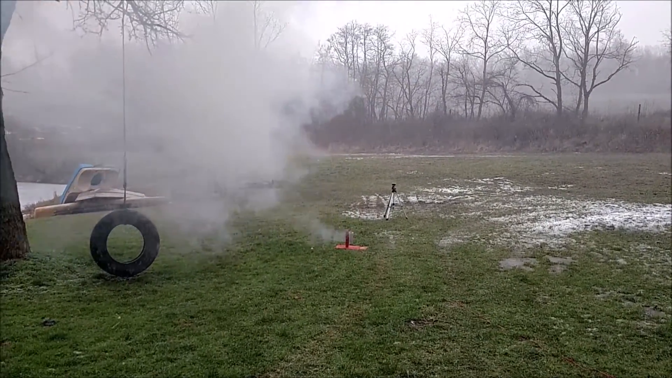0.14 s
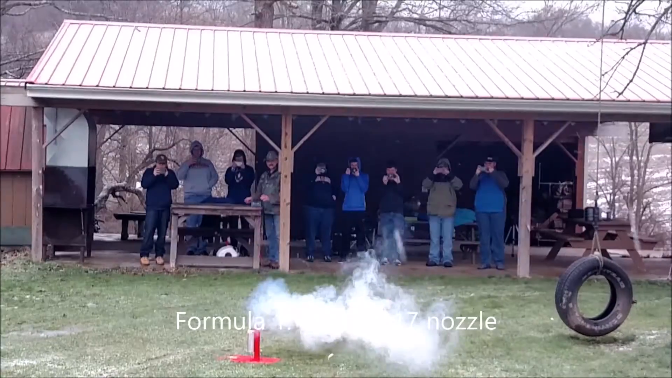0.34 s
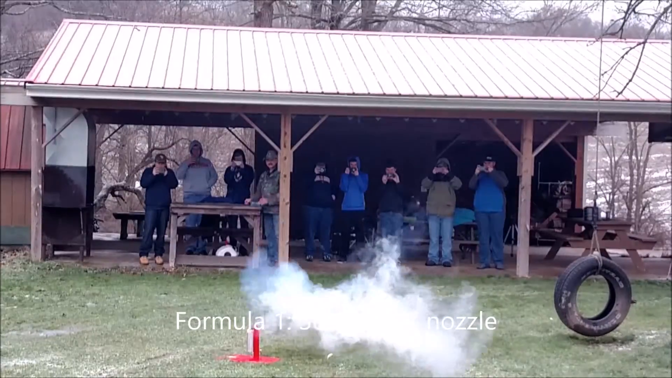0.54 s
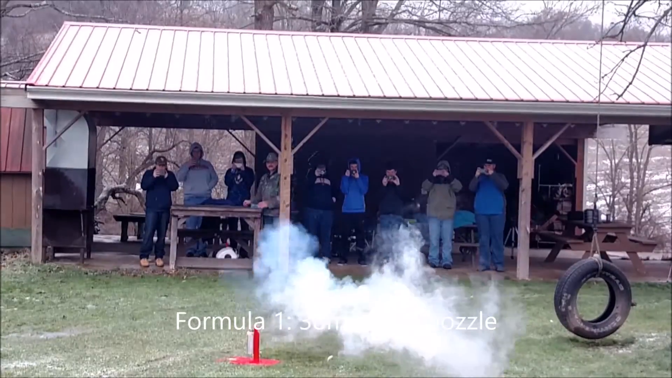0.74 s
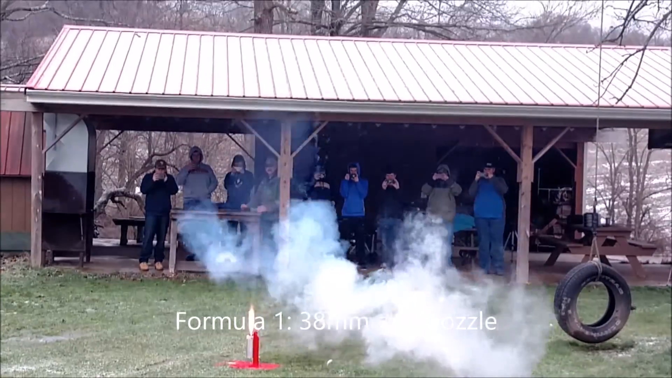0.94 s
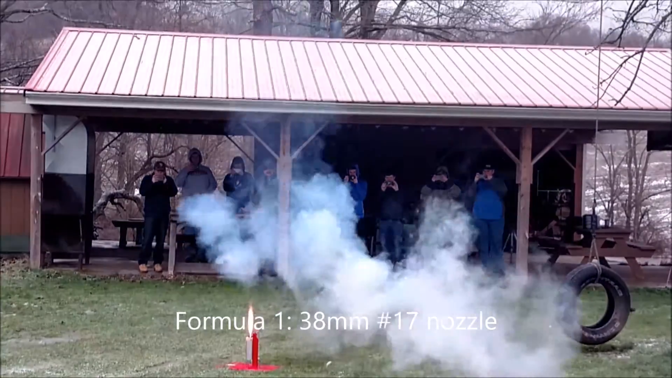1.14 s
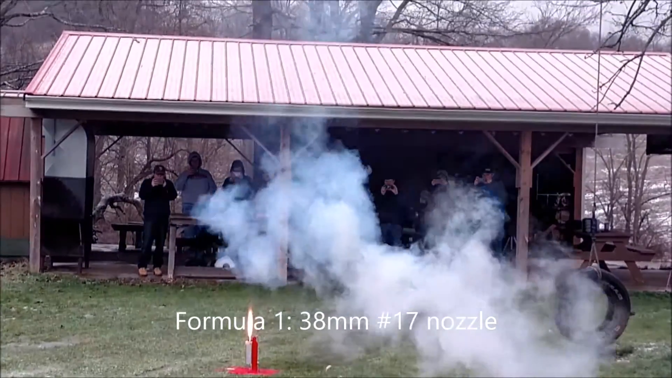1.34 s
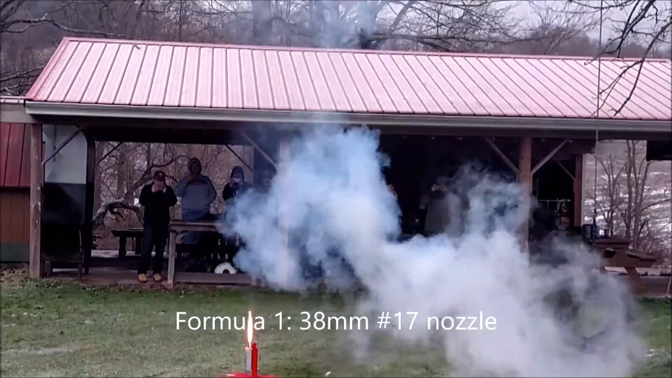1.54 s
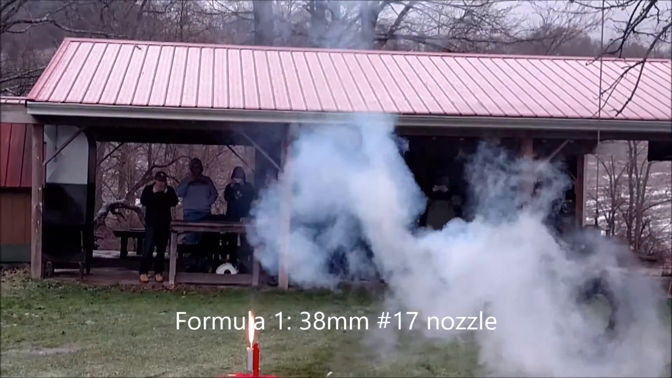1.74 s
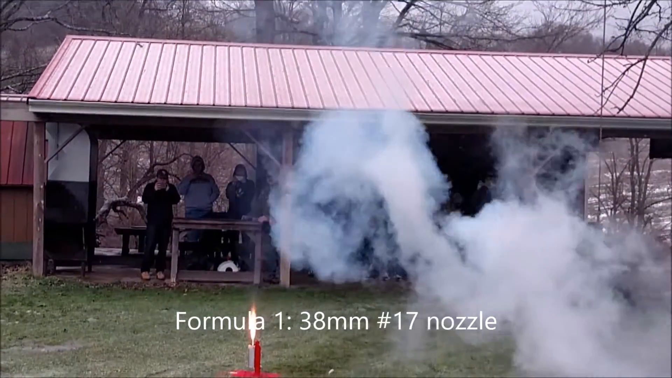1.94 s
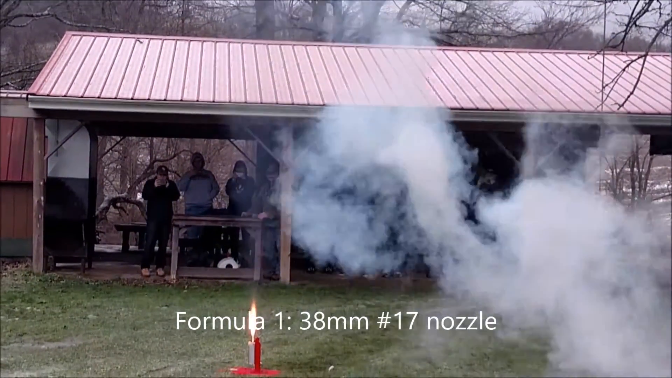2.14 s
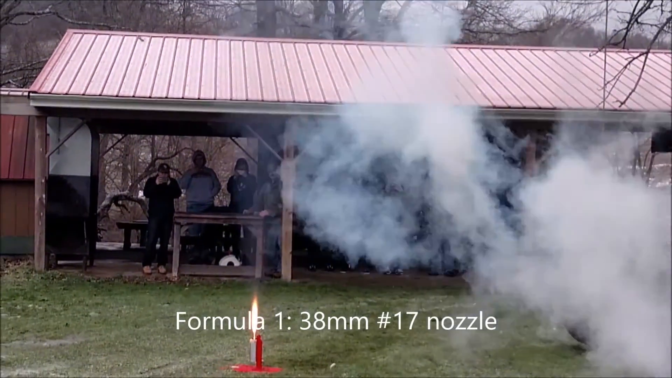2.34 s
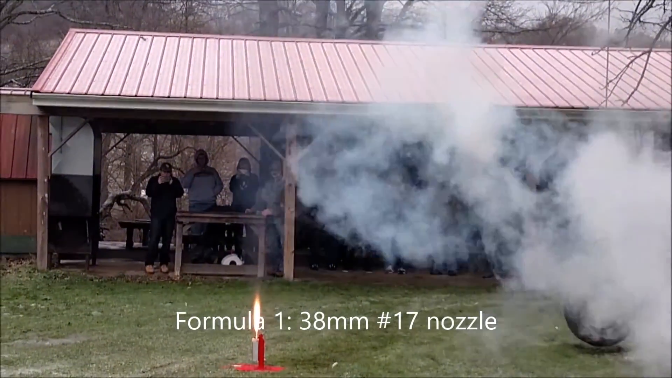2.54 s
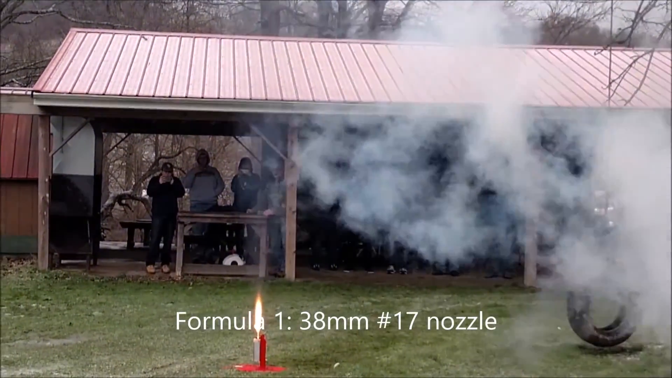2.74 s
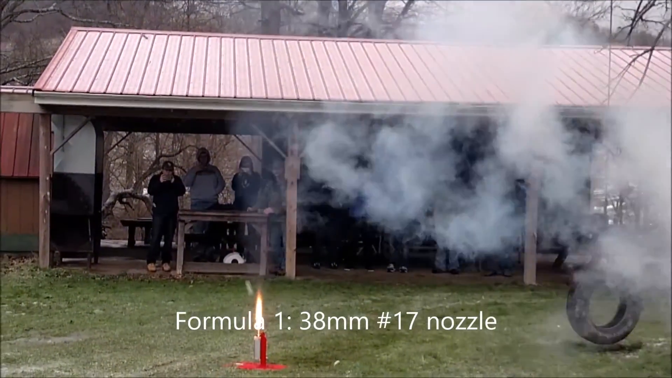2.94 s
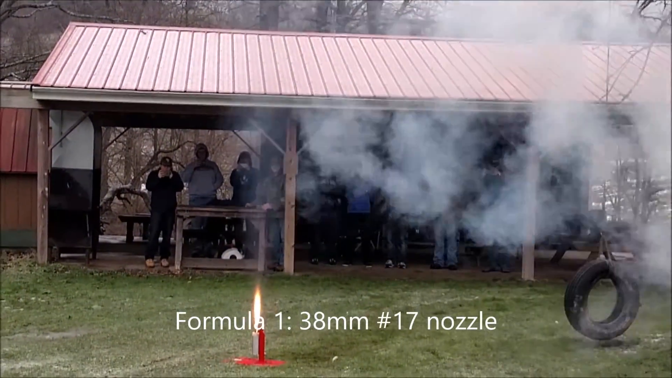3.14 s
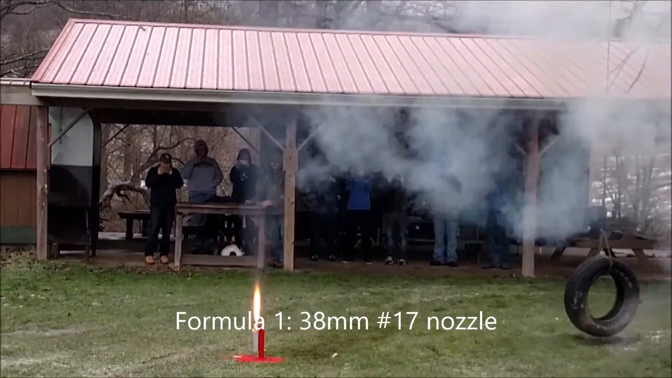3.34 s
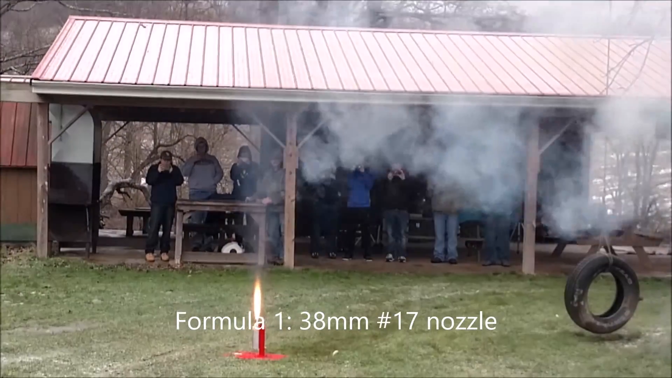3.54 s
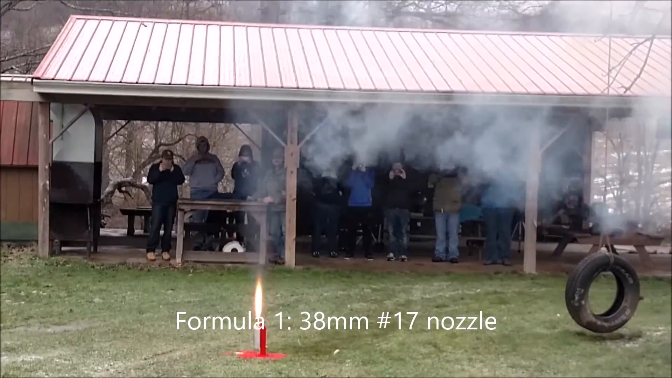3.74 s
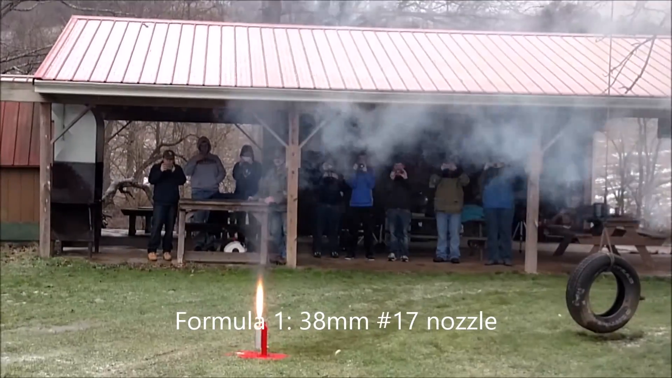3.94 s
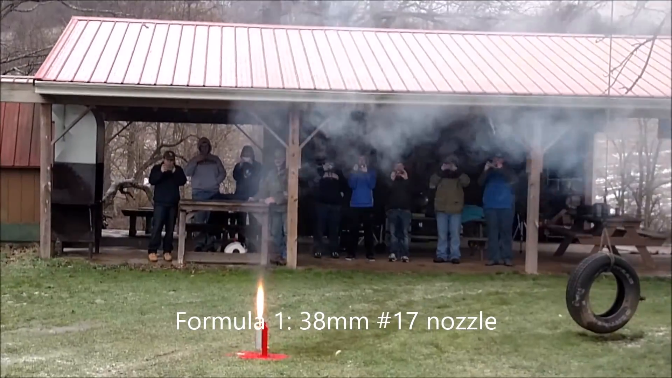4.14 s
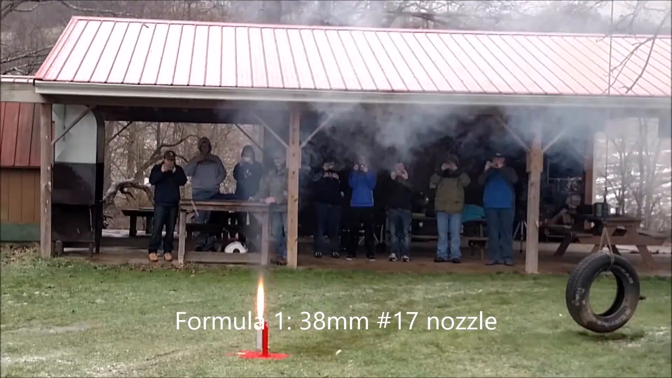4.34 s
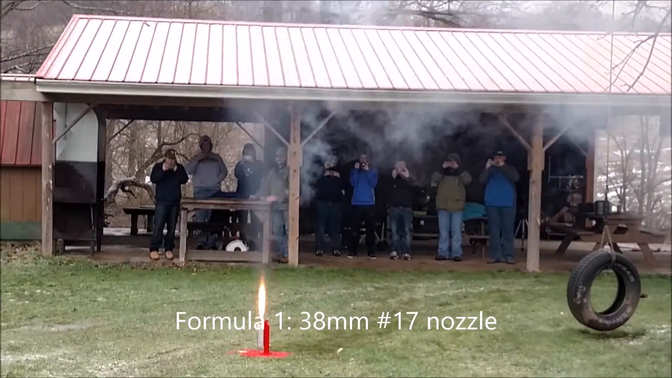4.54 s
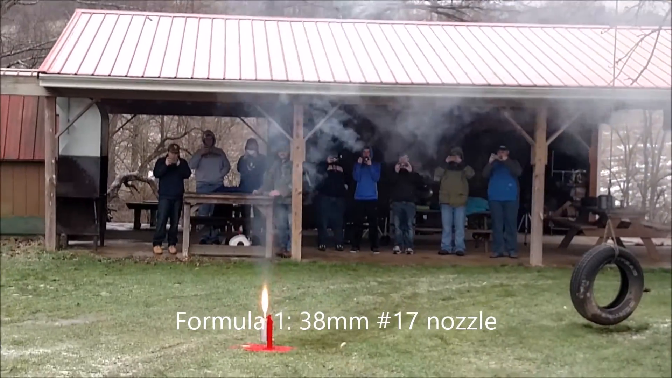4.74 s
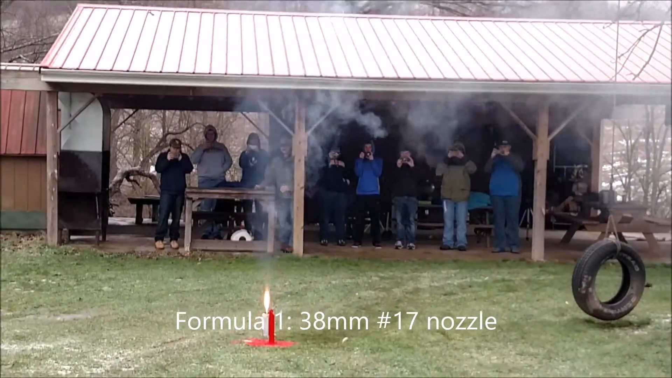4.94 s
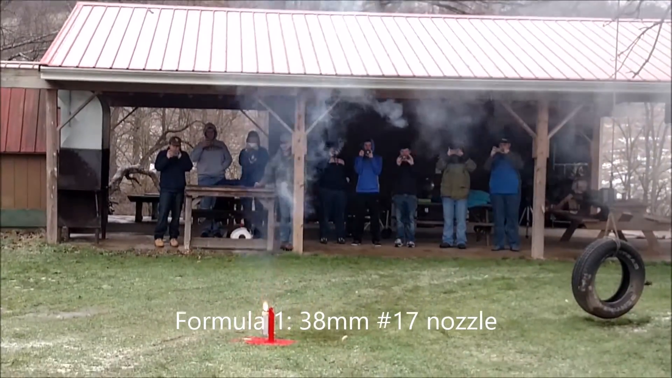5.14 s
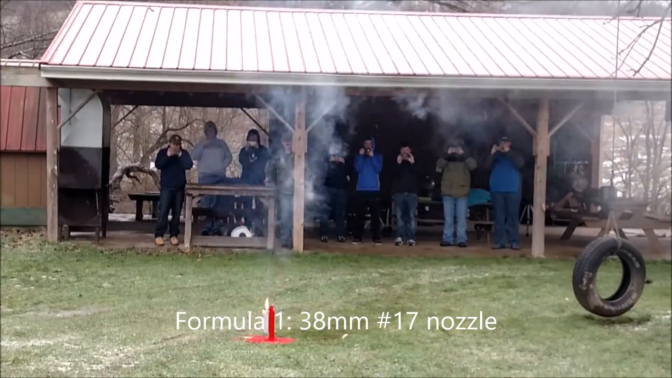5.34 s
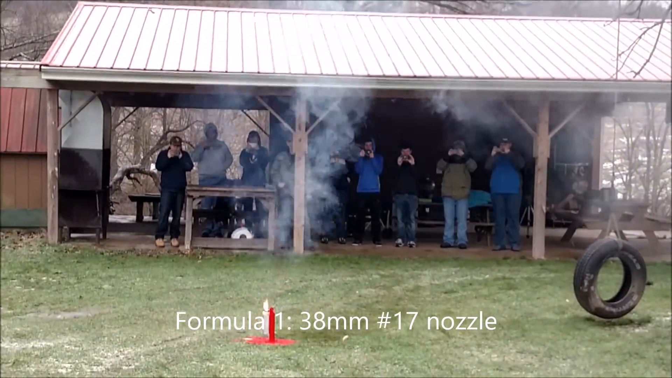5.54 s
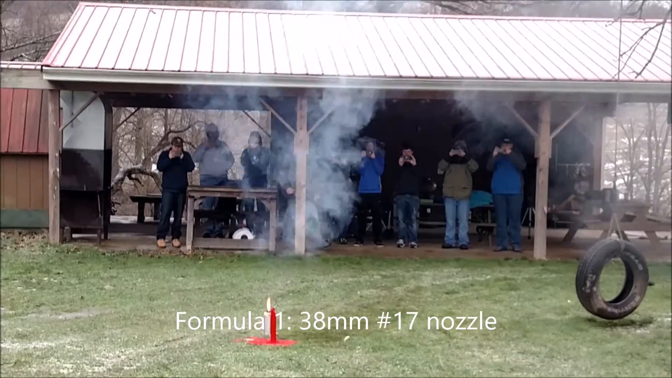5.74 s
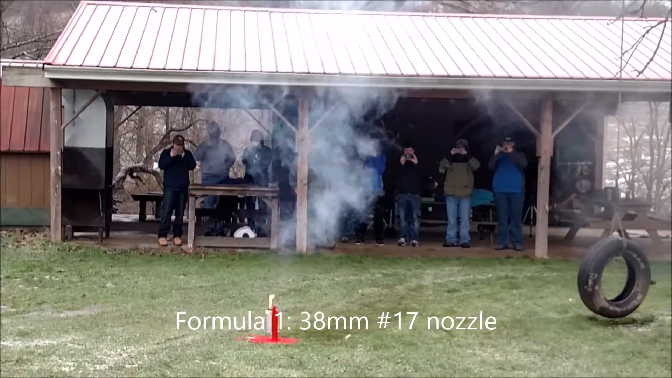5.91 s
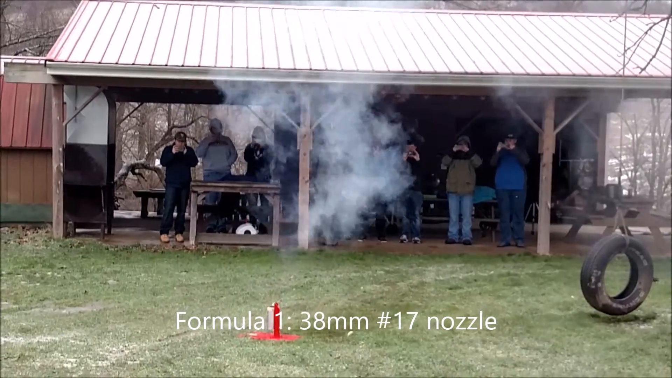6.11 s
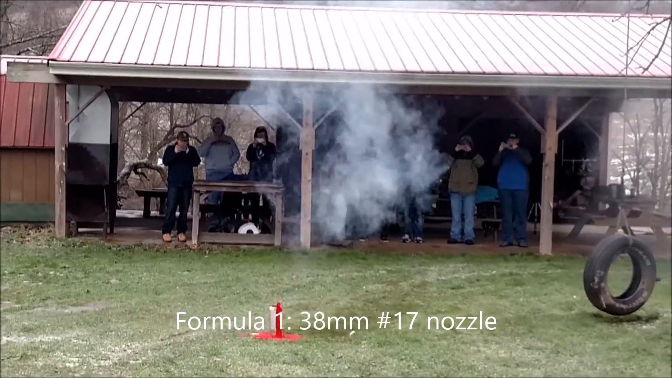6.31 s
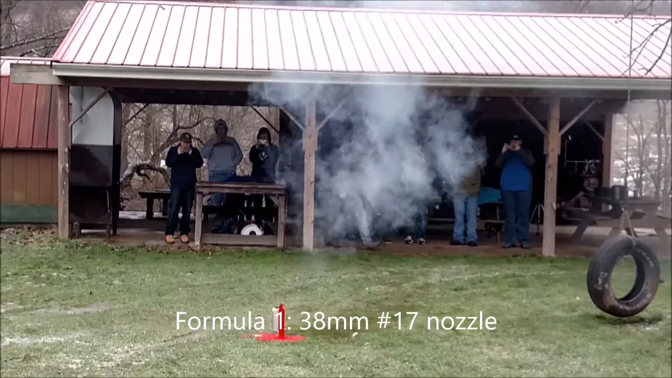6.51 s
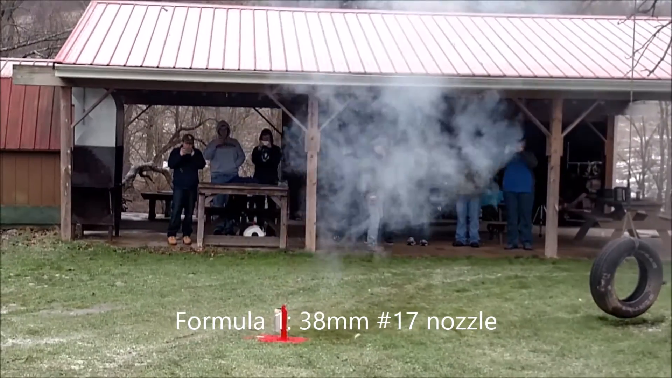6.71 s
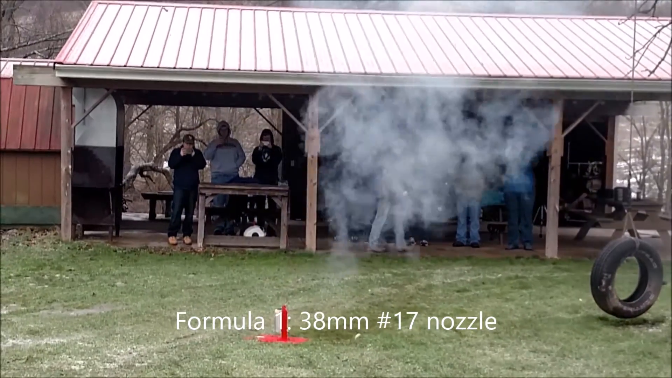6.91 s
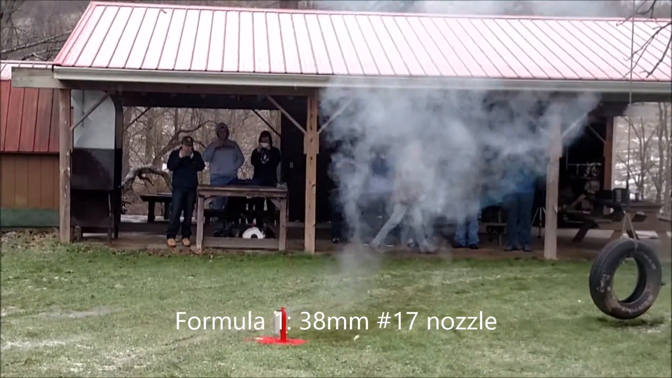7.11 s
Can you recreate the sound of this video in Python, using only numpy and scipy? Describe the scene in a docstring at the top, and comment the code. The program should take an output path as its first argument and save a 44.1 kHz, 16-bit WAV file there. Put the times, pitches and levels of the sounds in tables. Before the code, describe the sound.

A small rocket motor hisses out smoke, chokes twice, lights into a loud rushing roar crackling with sharp pops, then dies with a breathy sigh.

```python
"""In an open field, a small solid rocket motor burns on a stand, some metres from a mono microphone.
Smoke hisses out as pressure builds, the nozzle clogs twice, then the jet lights into a loud rush.
Hiss and roar are filtered noise; pockets of fuel-rich gas pop in the flame as sharp pressure pulses.
The fuel runs out and the last gas sighs and puffs away. Light wind nudges the microphone as soft, slower pulses.
The sound drops out briefly near the start and stops just before the end."""
import sys
import numpy as np
from scipy import signal
from scipy.fft import rfft, irfft
from scipy.io import wavfile
from scipy.ndimage import uniform_filter1d

SR = 44100
rng = np.random.default_rng(int(sys.argv[2]) if len(sys.argv) > 2 else 0)


def master_out(mix):
    """Clip the mix to full scale and print it as 16-bit PCM to the path in sys.argv[1]."""
    frames = np.transpose(np.atleast_2d(mix))
    ceiling = np.clip(frames, -1, 1)
    pcm = np.round(ceiling * 32767).astype(np.int16)
    wavfile.write(sys.argv[1], SR, pcm)


N = 320607
TIME = np.arange(N) / SR
FREQ = np.maximum(np.arange(N // 2 + 1) * SR / N, 1)  # 1 Hz floor keeps divisions and logs safe

# the jet lights; the fuel is spent, and the hiss starts to fade at this rate
LIGHT_S, BURNOUT_S, FALL_DB_PER_S = .938, 5.278, 52
HISS_TILT_DB = -1.12  # usual brightness of the hiss, dB per octave


def undb(db):
    """Decibels to gain."""
    return 10 ** (np.asarray(db) / 20)


def unit(x):
    """Scale to rms 1."""
    return x / np.sqrt(np.mean(x ** 2))


def curve(rows):
    """The columns of a table, joined by straight lines in time."""
    s, *columns = np.transpose(rows)
    return [np.interp(TIME, s, c) for c in columns]


def since(s):
    """Seconds passed since a moment; 0 before it."""
    return np.maximum(TIME - s, 0)


def fading(s, decay_s):
    """Jumps to 1 at a moment and dies away."""
    return (TIME >= s) * np.exp(-since(s) / decay_s)


def colour(points):
    """Gain at every frequency from (Hz, dB) points."""
    hz, db = np.transpose(points)
    return undb(np.interp(np.log(FREQ), np.log(hz), db))


def shape(x, gain):
    """Filter by a gain at every frequency."""
    return irfft(rfft(x) * gain, N)


def resonance(hz, width_hz):
    """Response of a band-pass, gain 1 at the centre."""
    return 1 / (1 + 1j * (FREQ ** 2 - hz ** 2) / (FREQ * width_hz))


def hollow(hz, width_hz, depth):
    """A band that is partly missing, from a near reflection or the microphone's own colour."""
    return 1 - depth * resonance(hz, width_hz)


def ground(lag_ms, share):
    """The bounce off the grass arrives just after the direct sound and combs it; the treble scatters."""
    scattered_share = share / np.hypot(1, FREQ / 4000)
    return 1 + scattered_share * np.exp(-2j * np.pi * FREQ * lag_ms * 1e-3)


def walk(rate):
    """Random levels, each held for 1 / rate seconds, then smoothed twice; spread near 1."""
    k = max(int(SR / rate), 1)
    steps = np.repeat(rng.standard_normal(N // k + 1), k)
    smooth = uniform_filter1d(uniform_filter1d(steps, k), k)
    return unit(smooth[:N])


def turbulence(gain, tilt_db, flicker_db, flicker_rate):
    """Coloured noise in overlapping bands half an octave apart; each flickers alone, all tilt about 4400 Hz."""
    noise = rfft(unit(shape(rng.standard_normal(N), gain)))
    octaves = np.clip(np.log2(FREQ / 4400), -4, 1.5)
    out = 0
    for centre in np.arange(-4, 2, .5):
        band = irfft(noise * np.maximum(1 - 2 * abs(octaves - centre), 0), N)
        # the tilt levels off about an octave either side of 4400 Hz
        tilt = tilt_db * np.clip(centre, -1.05, 1.2)
        out = out + band * undb(tilt + flicker_db * walk(flicker_rate))
    return out


def pulses(rows, rebound, sharpness, low_hz):
    """Each (s, dB, ms) is a sharp pressure swing and a slower, rounder swing back."""
    out = np.zeros(N)
    for s, db, ms in rows:
        length = max(ms, .5) * SR / 1000
        i = np.arange(max(int(s * SR - 2 * length), 0), min(int(s * SR + 4 * length), N))
        u = (i - s * SR) / length
        swing = 1 / np.cosh(1.5 * u / sharpness)
        swing_back = rebound * np.exp(-((u - 1) / 0.63) ** 2)
        out[i] += undb(db) * (swing_back - swing)
    return shape(out, FREQ / np.hypot(FREQ, low_hz))  # takes out the deepest bass


def patter(count, ms, scatter_db):
    """Small pulses at random moments, of random size and length; rms 1."""
    when, size, length = rng.random((count, 3)).T
    rows = np.transpose([when * N / SR, scatter_db * (2 * size - 1), ms * 2 ** (2 * length - 1)])
    return unit(pulses(rows, rebound=.6, sharpness=.28, low_hz=50.25))


# relative spectrum of the open land: [f/Hz, level/dB]
LAND_SPECTRUM = [(40, -14), (110, -14.5), (400, -15), (900, -14), (1600, -10.5), (2500, -16), (4000, -22),
                 (7000, -32.5), (15000, -37.5)]
# light wind on the microphone: [t/s, level/dB]
WIND_LEVEL = [(0, -47.5), (.12, -54), (.3, -63.5), (6.1, -76.5), (6.4, -73), (6.97, -67), (7.04, -58),
              (7.17, -51)]
# strongest wind eddies, level before the bass is thinned: [t/s, level/dB, time to the swing back/ms]
WIND_BUFFETS = [(.073, -33.5, 2.7), (6.488, -44, 2.8), (6.667, -53, 3.5), (7.031, -41, 2.2),
                (7.064, -43, 2.3)]


def field():
    """The land is a soft wash of noise; wind presses on the microphone in small and larger pulses."""
    wash = turbulence(colour(LAND_SPECTRUM), 0, flicker_db=-2.0, flicker_rate=3.1) * undb(-60.5)
    breeze = patter(count=1800, ms=2.6, scatter_db=3.5) * undb(curve(WIND_LEVEL)[0])
    buffets = pulses(WIND_BUFFETS, rebound=0.92, sharpness=0.27, low_hz=60)
    return wash + breeze - buffets


def echo(x, t60_s, dull_hz, db):
    """The shelter and the trees scatter a faint, dull tail back, modelled as fading noise."""
    tail = rng.standard_normal(N) * undb(-60 * TIME / t60_s) * np.minimum(TIME / .03, 1)
    tail = shape(tail / np.sqrt(np.sum(tail ** 2)), 1 / np.hypot(1, FREQ / dull_hz))
    return signal.fftconvolve(x, tail)[:N] * undb(db)


# the nozzle spitting, the flame catching, a brief whistle as it fails; level before the burst's rise and fade,
# width before the filter is applied twice: [t/s, level/dB, decay/s, centre f/Hz, width/Hz]
GAS_SPITS = [(0.56, -30, .0079, 350, 500), (.628, -31.5, .008, 330, 400), (.688, -26.5, .0052, 250, 305),
             (.878, -16, .002, 5000, 7000), (.94, -15.5, .012, 1660, 3000), (5.229, -12, 0.021, 4180, 350)]


def spits():
    """Short bursts of gas, made of band-passed noise, start almost at once and die away."""
    out = 0
    for s, db, decay, hz, width_hz in GAS_SPITS:
        age = since(s)
        burst = unit(shape(rng.standard_normal(N), resonance(hz, width_hz) ** 2))
        out = out + burst * undb(db) * np.exp(-age / decay) * (1 - np.exp(-8 * age / decay))
    return out


# how restless the flame is, before the trim and the fade at burnout: [t/s, level/dB]
FLAME_FLUTTER = [(1.0, -48), (1.1, -36), (1.26, -35.5), (1.89, -38.5), (2.1, -29), (2.36, -22), (2.53, -28),
                 (2.73, -22.5), (2.91, -22), (3.63, -27), (3.77, -24), (3.9, -21), (4.31, -17.5),
                 (4.41, -17.5), (4.87, -23), (5.4, -50.5)]
FLUTTER_TRIM_DB = 1.65


def restlessness():
    """Strength of the small pops; they need a flame and die with the pressure."""
    fade_db = 2 * FALL_DB_PER_S * since(BURNOUT_S)
    return undb(curve(FLAME_FLUTTER)[0] + FLUTTER_TRIM_DB - fade_db) * (TIME > LIGHT_S)


# relative spectrum of the large eddies: [f/Hz, level/dB]
ROAR_SPECTRUM = [(60, -30), (100, -23), (170, -9), (310, 1.5), (450, -3), (720, -3), (1300, -4.5),
                 (2000, -15.5), (5000, -48.5)]
# roar against the hiss, dB gained for each dB per octave of dulling, roar against the flutter
ROAR_DB, ROAR_PER_TILT, STIRRED_DB = -20.5, 0.96, -8
# a soft, low puff as the chamber empties; level before the random unsteadiness
PUFF_S, PUFF_DB, PUFF_RISE_S, PUFF_DECAY_S = 5.785, -33.5, 0.054, 0.079


def plume(level_db, tilt_db, flame):
    """Large eddies roar low and unevenly: more when the jet is slow and wide, in pops and in the last puff."""
    gain = colour(ROAR_SPECTRUM) * hollow(hz=1086, width_hz=310, depth=0.39)
    roar = unit(shape(rng.standard_normal(N), gain))
    from_jet = undb(level_db + ROAR_DB - ROAR_PER_TILT * (tilt_db - HISS_TILT_DB))
    stirred = undb(STIRRED_DB) * restlessness()
    puff_time_s = np.where(TIME < PUFF_S, PUFF_RISE_S, PUFF_DECAY_S)
    puff = undb(PUFF_DB) * np.exp(-abs(TIME - PUFF_S) / puff_time_s)
    strength = np.sqrt(from_jet ** 2 + stirred ** 2 + puff ** 2)
    unsteady_db = 1.7 + 2.2 * flame  # the flame stirs the plume more than smoke does
    return roar * strength * undb(unsteady_db * walk(70))


# the loudest gas pockets igniting, level before trim and filters: [t/s, level/dB, time to the swing back/ms]
GAS_POPS = [(1.285, -14.5, 2.3), (1.605, -13.5, 1.9), (2.004, -12.5, 3.1), (2.16, -4.5, 1.8),
            (2.183, -6.5, 2.3), (2.297, -5.5, 2.1), (2.348, -8, 2.1), (2.42, -3, 1.55), (2.458, 5.5, 1.6),
            (2.476, -2, 1), (2.518, -4, 2.6), (2.629, -2.5, 1.17), (2.782, 3, 1.8), (2.804, -2.5, 2.3),
            (2.886, -2, 2.4), (2.969, -7, 1.8), (3.042, -6, 2.2), (3.094, -4.5, 4.5), (3.174, -8, 2.5),
            (3.257, -2, 2.25), (3.3, -6, 1.84), (3.444, -4.5, 1.9), (3.525, -3.5, 2.1), (3.76, 1, 1.27),
            (3.804, 7.5, 1.23), (3.964, -2, 2.5), (4.041, -5, 2), (4.132, -5.5, 2.3), (4.152, -2.5, 2.4),
            (4.184, -2.5, 2), (4.228, 4.5, 2.8), (4.282, -0.3, 1.1), (4.294, -1.5, 1.5), (4.371, -1, 2.1),
            (4.43, 1, 2), (4.448, -2.5, 1.9), (4.611, -4.5, 2), (4.648, -5, 2.5), (4.838, -1.5, 2.9),
            (4.862, -2.5, 4.9), (4.874, .5, 1.84), (5.004, -5.5, 1.9), (5.187, -14, 2.1)]
POPS_TRIM_DB = 1.5


def afterburn():
    """Unburnt gas meets air and ignites in pockets: loud pops among a flutter of small ones."""
    flutter = patter(count=1100, ms=1.91, scatter_db=10.5) * restlessness()
    big_pops = pulses(GAS_POPS, rebound=0.76, sharpness=0.19, low_hz=50) * undb(POPS_TRIM_DB)
    # the hot gas swings on briefly after each pop
    return shape(big_pops + flutter, 1 + 0.32 * resonance(150, 90))


# slag clogs the nozzle; values before the edges are smoothed: [t/s, clears t/s, narrowing beforehand/s,
# level/dB, leak time/s, added brightness while clogged/(dB per octave)]
NOZZLE_CLOGS = [(.773, 0.843, 0.063, -18.5, .065, 3), (0.889, 0.935, .026, -8.5, .16, 7.5)]
# brightness added by the narrowing throat (dB per octave); time to shut or open
PINCH_TILT_DB, CLOG_EDGE_S = 11.5, 0.0056


def clogging():
    """Each clog pinches the hiss brighter, shuts it, leaks, then lets go: (level dB, tilt dB per octave)."""
    level_db, tilt_db = 0, 0
    for s, clears, narrowing, depth_db, leak, bright_db in NOZZLE_CLOGS:
        shut = (TIME >= s) & (TIME < clears)
        pinch = (TIME < s) * np.exp(-abs(TIME - s) / narrowing)
        level_db = level_db + shut * depth_db * fading(s, leak)
        tilt_db = tilt_db + shut * bright_db + PINCH_TILT_DB * pinch
    return uniform_filter1d(np.array([level_db, tilt_db]), max(int(CLOG_EDGE_S * SR), 1))


# hiss at working pressure, before the trim and the changes added below: [t/s, level/dB]
BURN_LEVEL = [(1.1, -13.5), (2.16, -12.5), (2.19, -14), (4.93, -13), (5.15, -15)]
HISS_TRIM_DB = -0.15
# the chamber pressure builds towards its working value
START_S, BUILD_S, BUILD_POWER = 0.26, 0.37, 1.82
# the jet is briefly duller as it lights (dB per octave)
FLARE_S, FLARE_TILT_DB = 0.03, -4.5
# extra fall once the chamber is nearly empty
EMPTY_S, EMPTY_DB_PER_S = 5.87, 49
# a slower jet is duller: dB per octave for each dB lost, and the dullest tilt allowed (dB per octave)
BUILD_DULLING, FALL_DULLING, DULLEST_TILT_DB = .04, 0.17, -8
# a last breathy swell of gas
SIGH_S, SIGH_WIDTH_S, SIGH_DB, SIGH_TILT_DB = 5.745, 0.15, 8, -2


def outflow():
    """Pressure builds, holds and falls; level and brightness follow it: (level dB, tilt dB per octave)."""
    build_db = BUILD_POWER * 20 * np.log10(1e-3 + 1 - np.exp(-since(START_S) / BUILD_S))
    fall_db = -FALL_DB_PER_S * since(BURNOUT_S) - EMPTY_DB_PER_S * since(EMPTY_S)
    sigh = np.exp(-((TIME - SIGH_S) / SIGH_WIDTH_S) ** 2)
    clog_db, clog_tilt_db = clogging()
    level_db = curve(BURN_LEVEL)[0] + HISS_TRIM_DB + build_db + clog_db + fall_db + SIGH_DB * sigh
    flare_tilt_db = FLARE_TILT_DB * fading(LIGHT_S, FLARE_S)
    dulling_db = BUILD_DULLING * build_db + FALL_DULLING * fall_db
    tilt_db = HISS_TILT_DB + dulling_db + clog_tilt_db + flare_tilt_db + SIGH_TILT_DB * sigh
    return level_db, np.maximum(tilt_db, DULLEST_TILT_DB)


# the flame shrinks shortly before the fuel is spent
SHRINK_S, SHRINK_TIME_S = 5.196, 0.18


def flame_share():
    """The flame lights almost at once, stands, then shrinks: 1 = full flame, 0 = smoke only."""
    lighting = 1 - np.exp(-since(LIGHT_S) / 0.0037)
    return lighting * np.exp(-since(SHRINK_S) / SHRINK_TIME_S)


# relative spectrum of the burning jet: [f/Hz, level/dB]
FIRE_SPECTRUM = [(530, -44), (900, -18.5), (1400, -10), (1630, -11.5), (1840, -8), (2120, -11.5),
                 (2330, -8.5), (3110, -7), (4080, 0.5), (5700, -1.5), (6650, -6.5), (7680, -4), (8860, -4),
                 (13100, -27.5), (15500, -29.5)]
# relative spectrum of the smoke jet: [f/Hz, level/dB]
SMOKE_SPECTRUM = [(150, -44.5), (600, -23.5), (1400, -20.5), (1800, -6), (2100, -7), (2600, -3), (3400, 1),
                  (5600, 1), (7500, -11), (9500, -10.5), (12900, -38), (15500, -40.5)]


def jet(level_db, tilt_db, flame):
    """Gas rushing from the nozzle hisses: thin and unsteady as smoke, full and even once the flame stands."""
    mic_dip = hollow(hz=6600, width_hz=720, depth=.52)
    # the smoke jet is a compact source, so it is combed more deeply than the long flame
    compact = hollow(hz=4620, width_hz=850, depth=.68) * hollow(hz=1130, width_hz=400, depth=.7)
    smoke_gain = colour(SMOKE_SPECTRUM) * mic_dip * compact
    fire_gain = colour(FIRE_SPECTRUM) * mic_dip * ground(lag_ms=2.1, share=0.066)
    smoke = turbulence(smoke_gain, tilt_db, flicker_db=-0.8, flicker_rate=41)
    fire = turbulence(fire_gain, tilt_db, flicker_db=1.0, flicker_rate=25)
    # slag disturbs the flow until the nozzle has burnt clear
    unsteady_db = np.where(TIME < LIGHT_S, 1.6, .5)
    smoke = smoke * undb(unsteady_db * walk(70) - 1.34)
    fire = fire * undb(0.55 * walk(60) + 1.0)
    return undb(level_db) * (np.sqrt(1 - flame) * smoke + np.sqrt(flame) * fire)


def scene():
    """Everything reaches one microphone, the same in both channels."""
    level_db, tilt_db = outflow()
    flame = flame_share()
    hiss_and_roar = jet(level_db, tilt_db, flame) + plume(level_db, tilt_db, flame)
    motor = hiss_and_roar + afterburn() + spits()
    mono = motor + echo(motor, t60_s=0.44, dull_hz=3500, db=-21.5) + field()
    return np.array([mono, mono])


# when the sound is heard, 1 = on and 0 = silent: [t/s, gain]
SOUND_ON = [(0, 1), (.117, 1), (.12, 0), (.278, 0), (.284, 1), (7.169, 1), (7.173, 0)]
TOP_HZ = 15700  # the treble is cut above this


def record(dry):
    """The recorder flattens the biggest pops near full scale, follows the on-off gain and cuts the top."""
    flattened = dry / (1 + dry ** 10) ** .1
    held = flattened * curve(SOUND_ON)[0]
    return signal.sosfilt(signal.ellip(10, .1, 70, TOP_HZ, fs=SR, output="sos"), held)


dry = scene()
out = record(dry)
master_out(out)
```